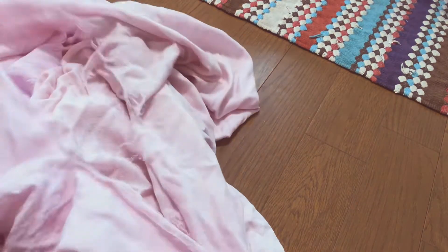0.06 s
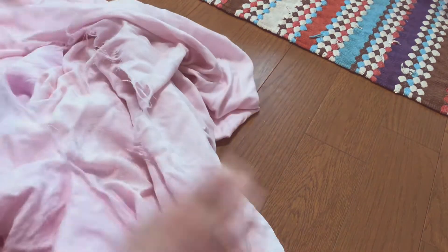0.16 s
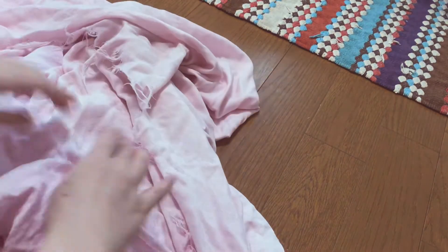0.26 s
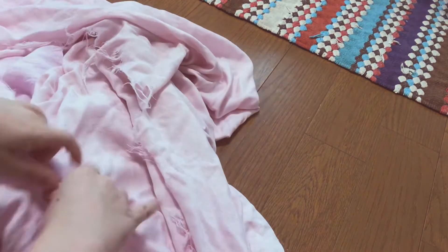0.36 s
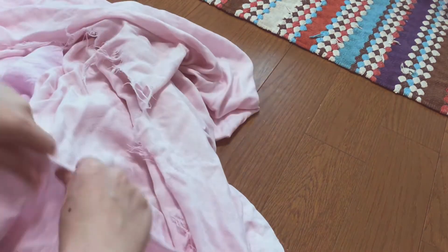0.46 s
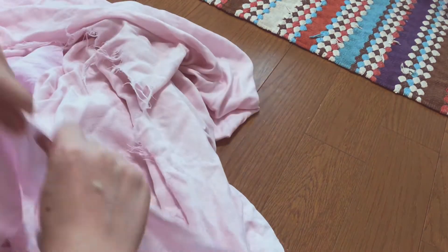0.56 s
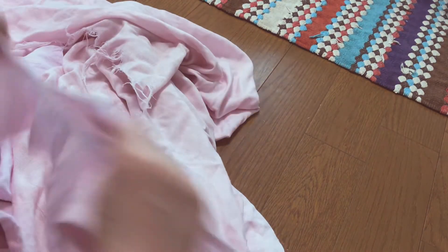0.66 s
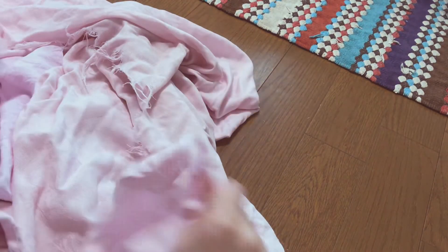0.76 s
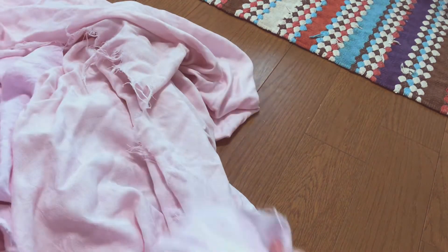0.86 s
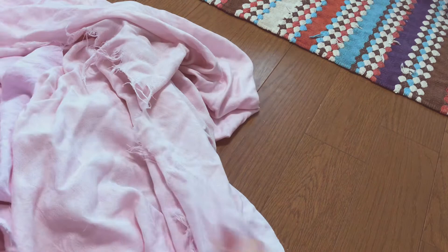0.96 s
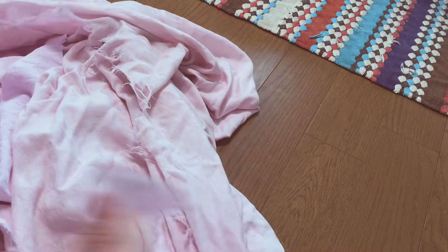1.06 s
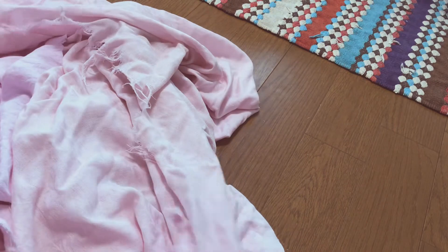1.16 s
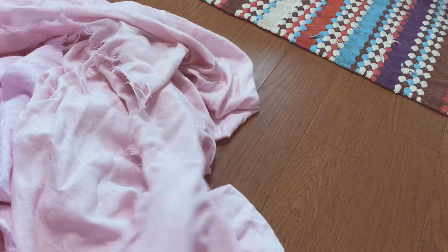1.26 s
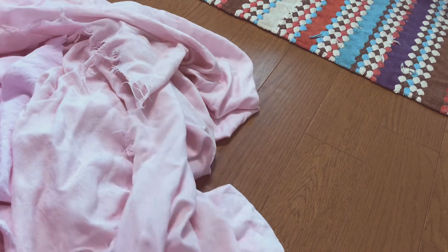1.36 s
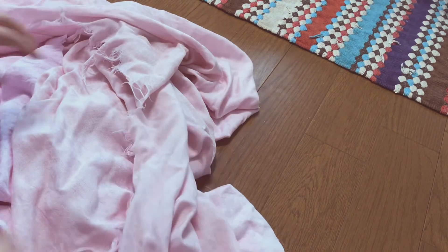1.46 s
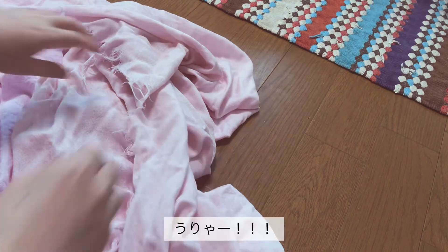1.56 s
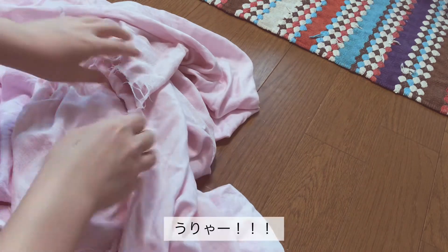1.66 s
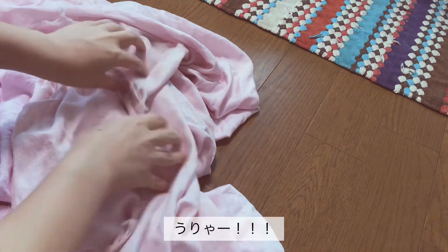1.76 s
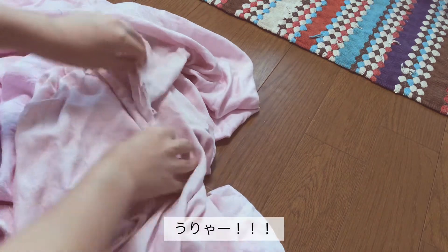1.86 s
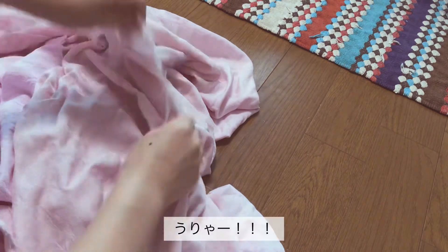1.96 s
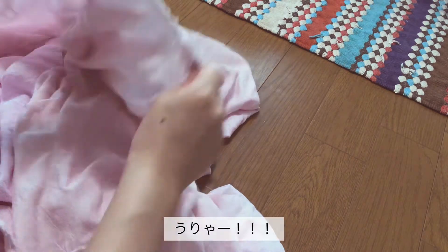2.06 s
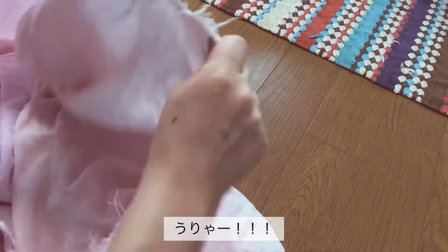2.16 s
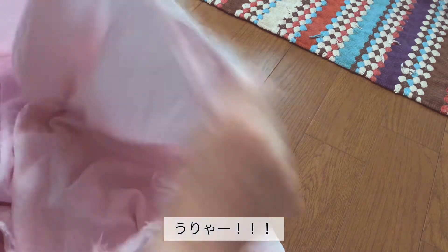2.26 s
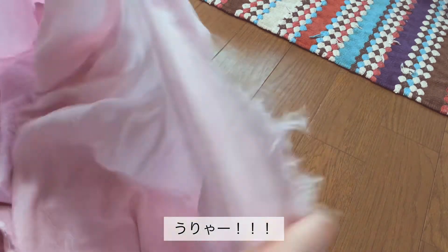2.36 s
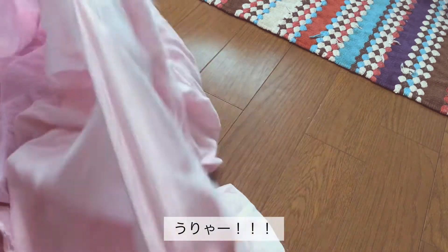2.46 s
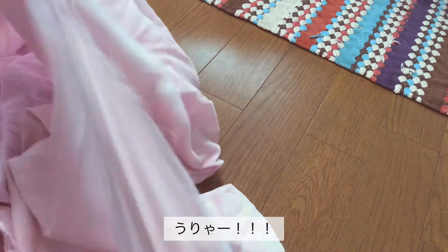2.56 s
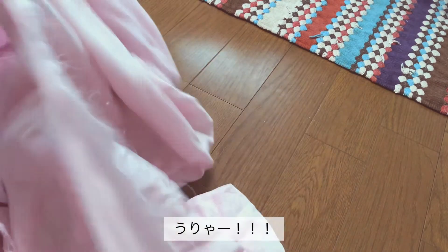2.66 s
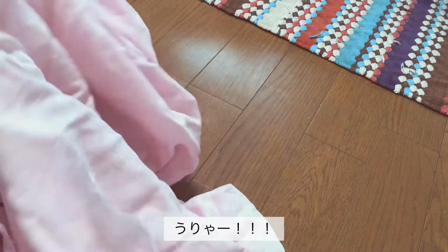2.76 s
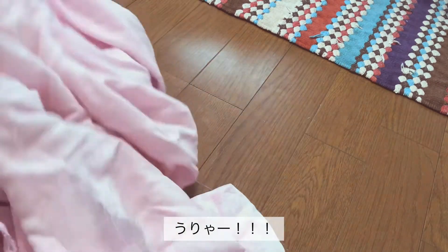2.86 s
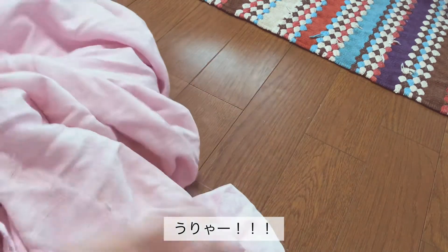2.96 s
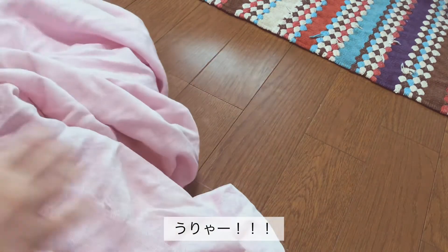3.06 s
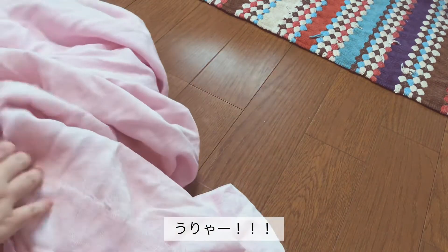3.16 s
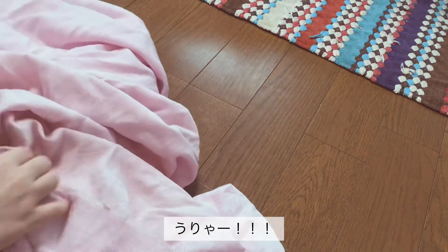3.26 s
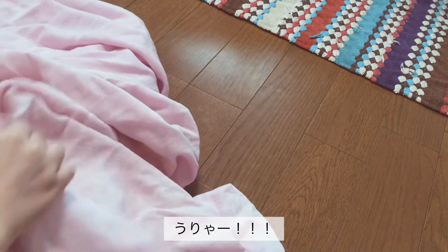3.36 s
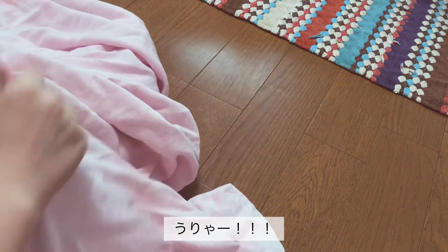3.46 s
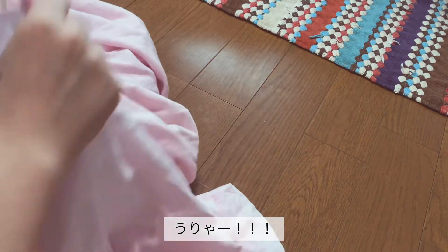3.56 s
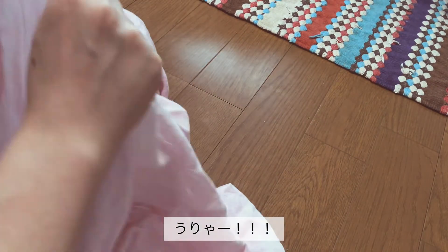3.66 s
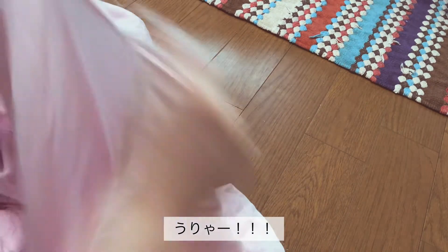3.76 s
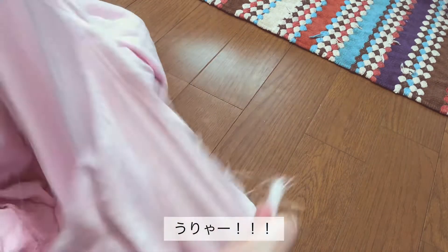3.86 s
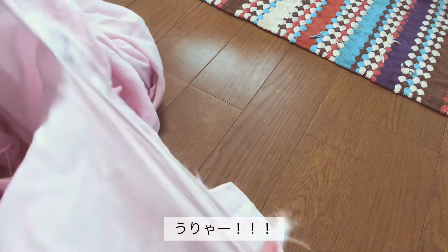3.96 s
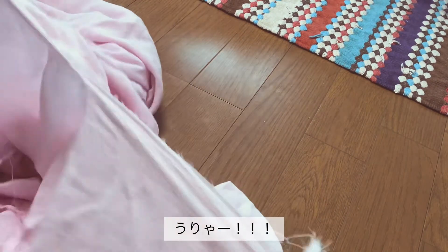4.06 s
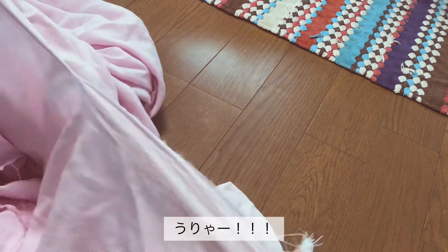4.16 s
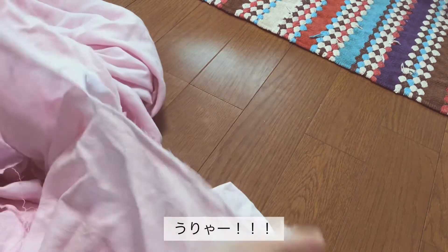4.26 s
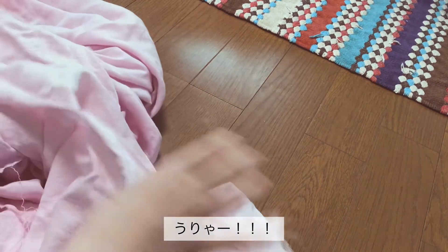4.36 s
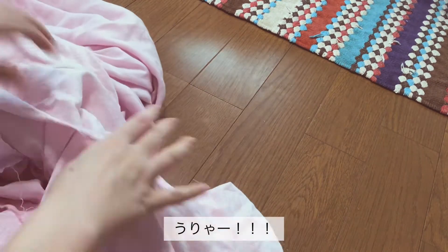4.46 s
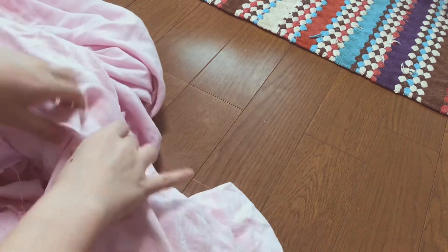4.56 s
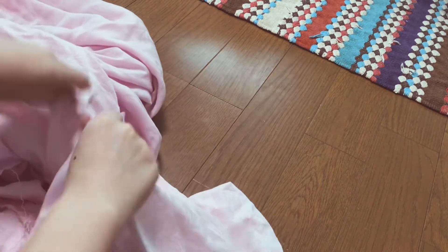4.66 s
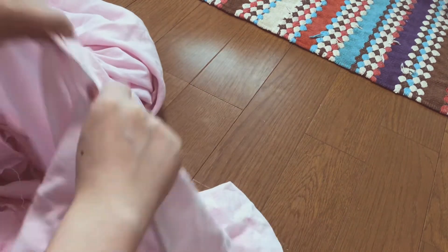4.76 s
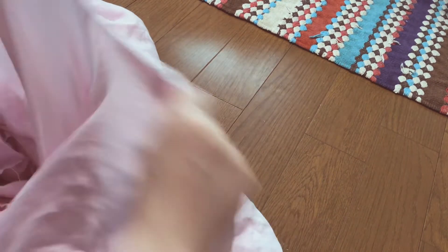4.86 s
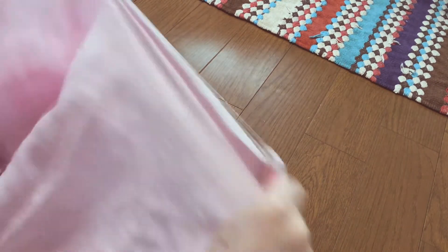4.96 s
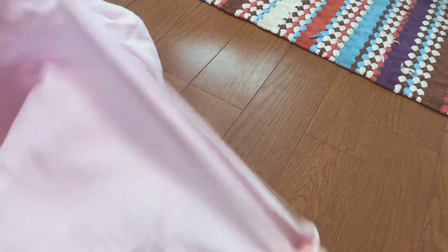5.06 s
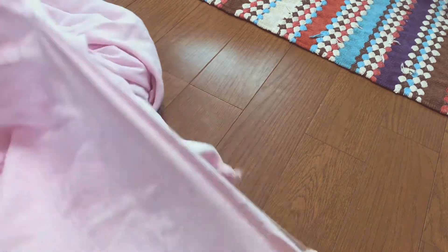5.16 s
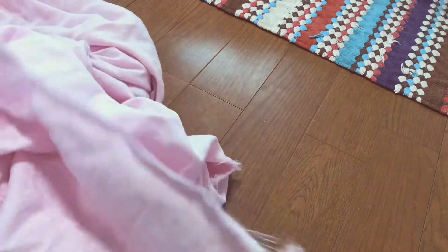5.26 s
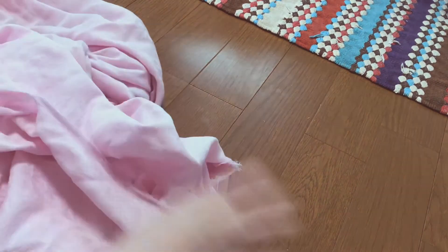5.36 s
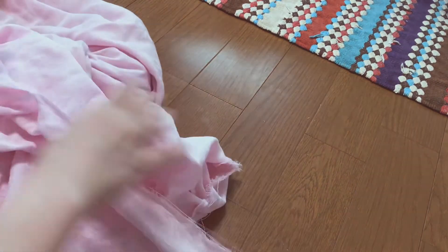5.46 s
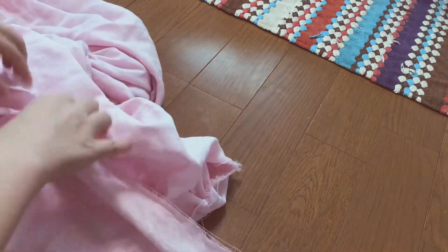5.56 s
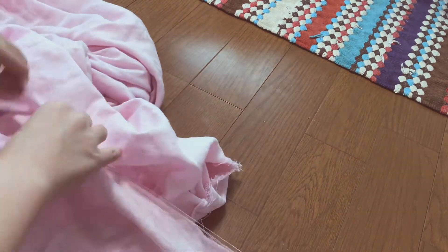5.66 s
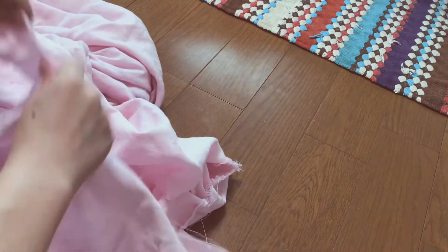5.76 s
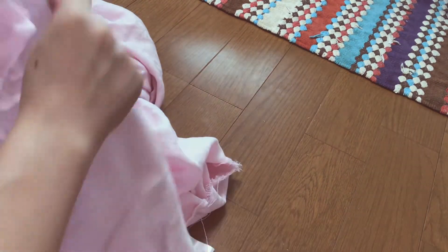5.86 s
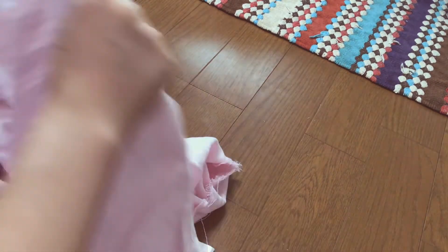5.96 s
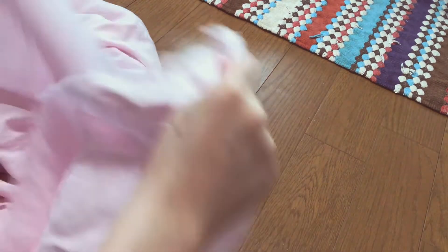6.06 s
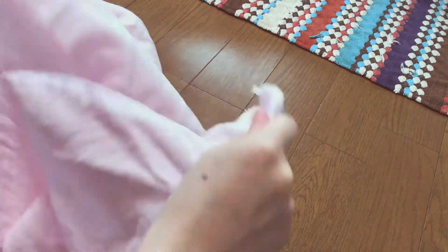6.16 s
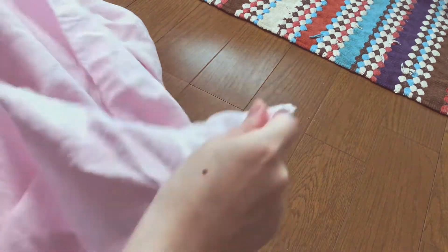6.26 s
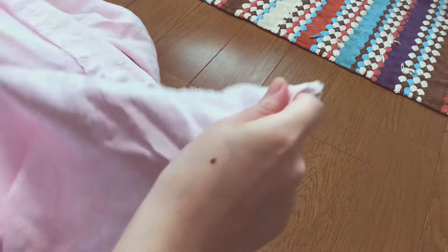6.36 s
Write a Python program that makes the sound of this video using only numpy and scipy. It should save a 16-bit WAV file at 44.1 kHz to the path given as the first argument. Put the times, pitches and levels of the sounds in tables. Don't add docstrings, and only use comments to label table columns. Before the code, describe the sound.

Old cotton fabric is ripped in separate short bursts, each a dense crackle of breaking threads, some beginning with slow ticking slips. Slack cloth flaps and dull thuds accompany the stronger jerks. Between tears there is only gentle rustling, soft hiss lingering after the loud pulls, low fan hum and a faint high insect. The microphone is close, with a light, short room reverberation.

```python
import sys
import numpy as np
from scipy import signal
from scipy.fft import rfft, irfft
from scipy.io import wavfile
from scipy.ndimage import uniform_filter1d

SR = 44100
rng = np.random.default_rng(int(sys.argv[2]) if len(sys.argv) > 2 else 0)


def gain_from_db(level_db):
    decades = np.asarray(level_db, float) / 20
    return 10 ** decades


def store_wav(level_fs):
    pcm = np.round(np.clip(np.atleast_2d(level_fs), -1, 1) * 32767)
    wavfile.write(sys.argv[1], SR, pcm.T.astype(np.int16))


N = 282240
TIME = np.arange(N) / SR


def rms_one(x):
    return x / np.sqrt(np.mean(x ** 2) + 1e-20)


def at_hz(points, hz):
    return np.interp(np.log(hz), np.log(np.array(points)[:, 0]), np.array(points)[:, 1])


def drift(rate):
    r = np.exp(-2 * np.pi * rate / SR)
    wander = signal.lfilter([1], [1, -2 * r, r * r], rng.standard_normal(N + SR))
    return rms_one(wander[SR:])


def resonance(x, hz, width_hz):
    r = np.exp(-np.pi * width_hz / SR)
    ringing = [1, -2 * r * np.cos(2 * np.pi * hz / SR), r * r]
    return signal.lfilter([(1 - r * r) / 2, 0, (r * r - 1) / 2], ringing, x)


def coloured(spectrum):
    hz = np.arange(N // 2 + 1) * SR / N + 1
    white = rfft(rng.standard_normal(N))
    return rms_one(irfft(white * gain_from_db(at_hz(spectrum, hz)), N))


def between(start, end, edge_s):
    return np.clip(np.minimum(TIME - start, end - TIME) / edge_s + .5, 0, 1)


def background():
    # (f/Hz, level/dB per Hz)
    air = [(18, -41), (30, -11), (88, 7), (114, -15.5), (141, -18.5), (225, -19), (7540, -41),
           (9540, -38.5), (10600, -38.5), (15700, -36)]
    # (f/Hz, width/Hz, level/dB)
    hum = [(51.9, 5.2, -56.5), (92, 4.6, -58.5)]
    # (start/s, end/s, f/Hz)
    insect_song = [
        (0, 1.59, 9660),
        (1.63, 2.06, 9640),
        (2.23, 2.84, 9700),
        (2.9, 6.4, 9750),
    ]
    insect_width_hz, insect_db = 300, -79
    out = gain_from_db(-60) * coloured(air)
    for hz, width, db in hum:
        out += gain_from_db(db) * rms_one(resonance(rng.standard_normal(N), hz, width))
    wings = rng.standard_normal(N)
    for start, end, hz in insect_song:
        buzz = resonance(wings, hz, insect_width_hz)
        buzz = resonance(buzz, hz, insect_width_hz)
        out += gain_from_db(insect_db) * between(start, end, .01) * rms_one(buzz)
    return out


def handling():
    # (t/s, level/dB, length/s)
    moves = [(0.545, -73.5, 0.11), (1.2, -79, .06), (2.027, -76.5, 0.12), (2.17, -74.5, .04),
             (2.29, -69, 0.035), (2.738, -77, 0.036), (2.867, -68, .03), (3.466, -75.5, 0.14),
             (3.62, -80, 0.045), (3.773, -67, 0.059), (4.272, -70, 0.034), (4.782, -74, 0.086),
             (5.788, -79, 0.12)]
    # (f/Hz, level/dB per Hz)
    rustle = [(500, -8.5), (2000, -2), (6000, -2), (12000, -2.5), (16000, -0.5)]
    level = gain_from_db(-78.5)
    for s, db, length in moves:
        level = level + gain_from_db(db) * np.exp(-((TIME - s) / length) ** 2)
    grain = gain_from_db(2 + 1.26 * drift(89.6))
    return level * grain * coloured(rustle)


def thumps():
    # (t/s, peak level/dB, f/Hz, length/ms)
    hits = [
        (1.776, -48, 330, 3.3),
        (1.777, -50, 560, 1.7),
        (2.367, -28, 610, 9),
        (2.385, -31, 92, 20),
        (2.63, -37, 75, 58),
        (3.814, -28.5, 268, 20),
        (3.828, -34, 77, 18),
        (6.047, -38, 197, 9.3),
    ]
    out = np.zeros(N)
    for s, db, hz, ms in hits:
        t = np.clip(TIME - s, 0, 1) * 1000 / ms
        puff = rng.standard_normal(N) * t * np.exp(-2 * t)
        for _ in range(2):
            puff = resonance(puff, hz, .6 * hz)
        out += gain_from_db(db) * puff / abs(puff).max()
    return out


def creeps():
    # (start/s, end/s, peak level/dB, centre f/Hz)
    runs = [(0.669, .69, -25.5, 8500), (2.292, 2.315, -46.5, 3300), (2.331, 2.351, -25, 4200),
            (2.391, 2.407, -17.5, 6500), (2.417, 2.42, -41, 3500), (2.447, 2.447, -35, 5800),
            (2.584, 2.6, -49, 6600), (2.673, 2.677, -38, 4200), (3.756, 3.757, -47, 4170),
            (3.7734, 3.809, -39, 5000), (3.933, 3.974, -26, 10200), (4.1122, 4.149, -29, 11000),
            (4.796, 4.826, -50.5, 7990), (4.844, 4.856, -39, 8610), (5.094, 5.138, -21, 8430),
            (5.1406, 5.172, -20.5, 8160), (5.194, 5.186, -18, 6400), (5.925, 5.926, -39, 7700),
            (5.942, 5.98, -32.5, 4460)]
    gap_s, jitter, spread_db, length_ms = .0057, .1, 2.5, .6
    out = []
    for start, end, db, hz in runs:
        for k in range(16):
            if start + gap_s * k >= end:
                break
            a, b, c, d = rng.standard_normal(4)
            late = jitter * a * (k > 0)
            pitch = min(hz * 2 ** (0.16 * c), 12000)
            out.append((start + gap_s * (k + late), db + spread_db * b, pitch, length_ms * 2 ** (0.27 * d)))
    return out


def slips(ring_share, after):
    # (t/s, peak level/dB, centre f/Hz, length/ms)
    lone = [(0.004, -23, 6800, 1.5), (0.6374, -33, 8900, 0.54), (0.6434, -24, 6600, 0.69),
            (0.6507, -28, 9500, 0.36), (0.6582, -24, 9000, 0.41), (0.6666, -23, 7400, 0.32),
            (2.2883, -33, 4300, 0.72), (2.3245, -26.5, 7500, 0.34), (2.327, -19, 5000, 0.65),
            (2.4389, -26, 4300, 0.63), (2.452, -29, 6300, 0.5), (2.5933, -35.5, 7800, 0.97),
            (2.6053, -23.5, 6400, 2.0), (2.619, -34, 8800, 1.1), (2.6289, -21, 7900, 0.45),
            (2.6325, -24, 7000, 1.8), (2.6908, -25, 4800, 1.3), (3.7657, -37.5, 4600, 0.94),
            (3.8488, -5, 7690, 0.49), (4.0872, -23, 11500, 0.44), (4.0937, -21, 11500, 0.33),
            (4.1027, -18, 11600, 0.23), (4.808, -37, 5790, 1.2), (4.837, -37, 8300, 0.3),
            (5.1716, -22.5, 7990, 0.62), (5.182, -21.5, 10000, 1.4), (5.2197, -27, 6940, 0.56),
            (5.912, -35.5, 7060, 0.28), (5.9387, -28.5, 5400, 0.46), (5.947, -23.5, 5610, 0.46)]
    size = 600
    out, t = np.zeros(N + size), np.arange(size) / SR
    for s, db, hz, ms in list(lone) + creeps():
        noise = rng.standard_normal(size)
        burst = after * noise * abs(noise) * np.exp(-t * 1000 / max(ms, .1))
        burst[0] = np.sign(noise[0])
        thin = signal.lfilter(*signal.butter(1, 0.28 * hz, "high", fs=SR), burst)
        burst = .5 * thin + ring_share * resonance(burst, hz, 0.49 * hz)
        first = round(s * SR)
        out[first:first + size] += gain_from_db(db) * burst / abs(burst).max()
    return out[:N]


def pulling():
    # (t/s, effort/dB, slack/dB)
    tail_pull = [(0, -45, 3.5), (.016, -46.5, -1), (.046, -65, -5), (.11, -69, -7)]
    # (t/s, effort/dB, slack/dB)
    first_pull = [(0.639, -55.5, 1), (.658, -54, -3), (.684, -38, -13), (.7, -43, 3), (.706, -36.5, 6.5),
                  (0.737, -29.5, 1.5), (.762, -33.5, -4.5), (0.785, -31, -3.5), (.79, -35, 9.5)]
    # (t/s, effort/dB, slack/dB)
    low_pull = [(2.288, -48, -4), (2.32, -47.5, 0.5), (2.332, -36, 0.5), (2.341, -40.5, -0.5),
                (2.355, -31.5, 2), (2.391, -36, -5), (2.396, -45, 0.5), (2.429, -49, -0.5),
                (2.463, -64, 2.5)]
    # (t/s, effort/dB, slack/dB)
    jerky_pull = [(2.601, -41.5, -4), (2.612, -52.5, 6), (2.626, -57.5, -5.5), (2.635, -42, 3),
                  (2.662, -49, -3), (2.677, -44, 1.5), (2.685, -54, -3.5), (2.702, -42.5, 2),
                  (2.71, -51.5, 0)]
    # (t/s, effort/dB, slack/dB)
    sharp_pull = [(3.755, -70, 6), (3.791, -53.5, 2.5), (3.822, -47, 6.5), (3.828, -33, -2),
                  (3.851, -27, -3), (3.862, -40, 3), (3.9, -35.5, -2.5), (3.921, -41, 1), (3.99, -59, 3)]
    # (t/s, effort/dB, slack/dB)
    short_pull = [(4.087, -62, -2.2), (4.112, -52.5, 1.35), (4.13, -55, 1.7), (4.151, -66, 1.2)]
    # (t/s, effort/dB, slack/dB)
    long_pull = [(4.834, -54, -3), (4.892, -35.5, -5), (4.948, -32.5, -0.5), (4.973, -34.5, 2.5),
                 (5.01, -30, -5), (5.055, -32.5, 2), (5.098, -33, 3.5), (5.138, -37.5, 2), (5.206, -56, 4)]
    # (t/s, effort/dB, slack/dB)
    last_pull = [(5.949, -55.5, 18), (5.968, -52, 9), (5.993, -52.5, 9), (6.001, -34.5, -4.5),
                 (6.039, -30, 0.5), (6.048, -25.5, -1), (6.052, -29, 8)]
    # (top/dB re rip, body/dB re rip, flap/dB re rip, jerkiness/dB)
    grips = [
        (0, -4.5, -19, -1.5),
        (7.5, -4.5, -26.5, -2.5),
        (-4, 0.5, -1, 0),
        (-10, -4.5, 1, -1.5),
        (4, -4.5, -15.5, -4.5),
        (-1, -6.5, -11, -3),
        (7, -4.5, -11.5, -1.5),
        (-2, -13.5, -18.5, -3),
    ]
    # (f at the start/Hz, f at the end/Hz)
    rings = [
        (6050, 3000),
        (3100, 2270),
        (1690, 1330),
        (5000, 1850),
        (6400, 2170),
        (6000, 620),
        (2240, 1120),
        (8800, 2400),
    ]
    late_clump_db = 4.5
    pulls = tail_pull, first_pull, low_pull, jerky_pull, sharp_pull, short_pull, long_pull, last_pull
    out = np.zeros((8, N))
    for pull, (top_db, body_db, flap_db, jerk_db), (first_hz, last_hz) in zip(pulls, grips, rings):
        s, effort_db, slack_db = np.transpose(pull)
        gate = between(s[0], s[-1], 0.00032)
        on = gate > 0
        effort = np.interp(TIME[on], s, effort_db)
        slack = np.interp(TIME[on], s, slack_db)
        torn = np.cumsum(gain_from_db(effort)) / np.sum(gain_from_db(effort))
        one = np.ones(on.sum())
        jerk = jerk_db + late_clump_db * torn ** 2
        ring_hz = first_hz * (last_hz / first_hz) ** torn
        out[:, on] = [gate[on], effort, slack, top_db * one, body_db * one, flap_db * one, jerk, ring_hz]
    return out


def rip(size_db, colour_db, patch_db, ring_db, ring_octaves):
    # (low f/Hz, high f/Hz)
    band_edges = [
        (2500, 9000),
        (9000, 16000),
        (700, 2500),
        (130, 500),
    ]
    full_db = -33
    breaks_per_ms, db_per_doubling = 11.0, 12
    body_follows, flap_follows = 0.79, 0.39
    fold_shared = .6
    gate, rip_db, slack, top, body, flap, jerk, ring_hz = pulling()
    spare = np.clip(full_db - rip_db, -10, 30)
    per_ms = breaks_per_ms * 2 ** (-spare / db_per_doubling)
    clump_db = jerk + 1.5 + 0.17 * spare

    top = top + .4 * slack
    body = body + 1.24 * slack + (1 - body_follows) * (spare - 5)
    flap = flap + 0.86 * slack + (1 - flap_follows) * (spare - 5)

    breaks = rng.random(N) < np.clip(per_ms, .3, 30) * 1000 / SR
    sizes = gain_from_db(size_db * np.minimum(rng.exponential(1, N), 3.0)) * rng.choice([-1, 1], N)
    sizes = breaks * sizes * gain_from_db(clump_db * np.clip(drift(450), -3, 1.5))
    sizes = sizes / np.sqrt(uniform_filter1d(sizes ** 2, size=350) + 1e-3)
    at = np.flatnonzero(breaks & (gate > 0))
    sizes = (sizes * gate)[at] * np.sqrt(SR / 2)

    low, high = np.transpose(band_edges)
    levels = np.array([rip_db, rip_db + top, rip_db + body, rip_db + flap])
    per_hz_db = levels[:, at].T - 10 * np.log10(high - low)
    order = np.argsort(low)
    out = np.zeros(N)
    edges = 110 * 2 ** (np.arange(23) / 3)
    fold = drift(22.3)
    for lo, hi in zip(edges, edges[1:]):
        fold = fold_shared * fold + np.sqrt(1 - fold_shared ** 2) * drift(33.5)
        place = np.interp(np.log(lo * hi), np.log(low * high)[order], np.arange(4))
        share = np.clip(1 - abs(place - np.arange(4)), 0, 1)
        octaves_off = np.log2(lo * hi / ring_hz[at] ** 2) / 2
        ring = ring_db * np.exp(-(octaves_off / ring_octaves) ** 2)
        ring = ring - 12 * max(0, np.log2(192 / lo))
        chance_db = colour_db * rng.standard_normal(N) + patch_db * min(1, 5000 / lo) * fold
        clicks = np.full(N, 1e-18)
        clicks[at] = sizes * gain_from_db(per_hz_db[:, order] @ share + ring + chance_db[at])
        out += signal.lfilter(*signal.butter(1, [lo, hi], "band", fs=SR), clicks)
    return out


def room(x):
    # (f/Hz, t/s)
    fade = [(200, 0.28), (1500, 0.3), (6000, 0.29), (14000, 0.14)]
    room_db, floor_echo_ms, floor_echo_db = -12, .8, -49.5
    t, tail = np.arange(SR // 2) / SR, 0
    for hz in 125 * 2. ** np.arange(8):
        edges = [hz / 2 ** .5, min(hz * 2 ** .5, .45 * SR)]
        band = signal.butter(2, edges, "band", fs=SR, output="sos")
        noise = signal.sosfilt(band, rng.standard_normal(len(t)))
        tail = tail + noise * gain_from_db(-60 * t / at_hz(fade, hz))
    tail = tail * np.clip(t / 0.0009, 0, 1)
    reply = gain_from_db(room_db) * tail / np.sqrt(np.sum(tail ** 2))
    reply[0] = 1
    reply[round(floor_echo_ms * SR / 1000)] += gain_from_db(floor_echo_db)
    return signal.fftconvolve(x, reply)[:N]


def scene():
    # (f/Hz, width/Hz, level/dB)
    body = [(614, 33, -33), (1060, 79, -7.5), (1720, 330, -12.5), (13800, 2500, -9.5)]
    tear = gain_from_db(-8.5) * rip(size_db=3.5, colour_db=3.5, patch_db=3.0, ring_db=9.5, ring_octaves=0.12)
    tear = tear + slips(ring_share=0.5, after=0.33)
    tear = tear + sum(gain_from_db(db) * resonance(tear, hz, width) for hz, width, db in body)
    in_room = room(gain_from_db(1.0) * tear + handling() + thumps())
    return (in_room + background())[None]


def roll_off(x):
    return signal.sosfilt(signal.butter(12, 17000, fs=SR, output="sos"), x)


def record(dry):
    # (f/Hz, level/dB per Hz)
    hiss = [(82, -44), (140, 1), (200, -5.5), (230, -5.5), (355, -3.5), (508, -10.5), (11700, -18),
            (16000, -22)]
    # (start/s, end/s, level/dB)
    hiss_held = [
        (0, 0.416, -62),
        (0.667, 1.194, -62),
        (3.803, 4.3, -62),
        (4.802, 5.474, -61.5),
        (5.916, 6.406, -61.5),
    ]
    held = sum(gain_from_db(db) * between(start, end, 0.0043) for start, end, db in hiss_held)
    heard = dry + held * coloured(hiss)
    heard = signal.sosfilt(signal.butter(3, 40.2, "high", fs=SR, output="sos"), heard)
    heard = heard - 0.64 * resonance(heard, 10320, 380)
    heard = .3 * np.tanh(heard / .3)
    heard = signal.sosfilt(signal.ellip(12, .5, 70, 15780, fs=SR, output="sos"), heard)
    return roll_off(heard)


dry = scene()
out = record(dry)
store_wav(out)
```